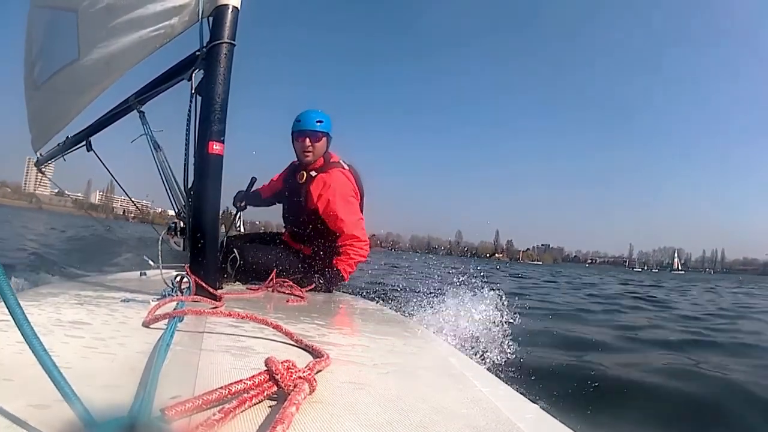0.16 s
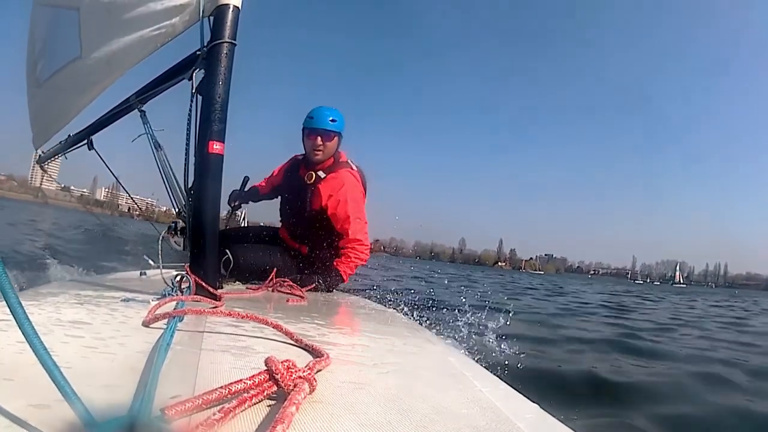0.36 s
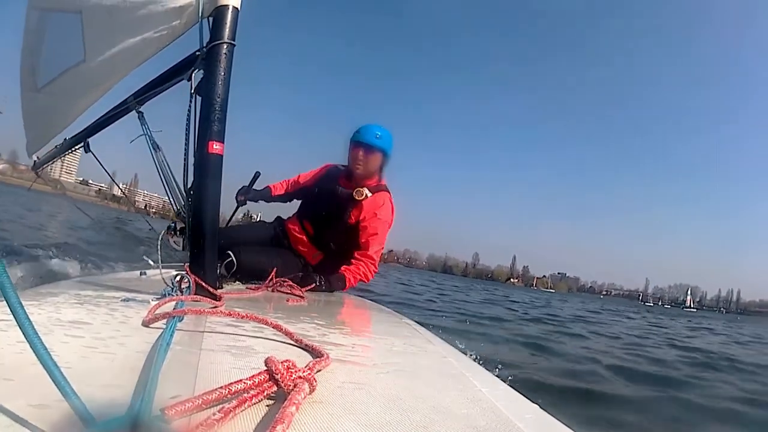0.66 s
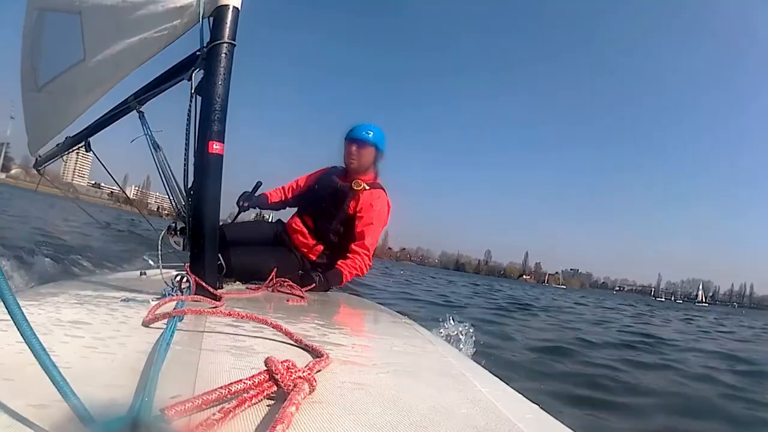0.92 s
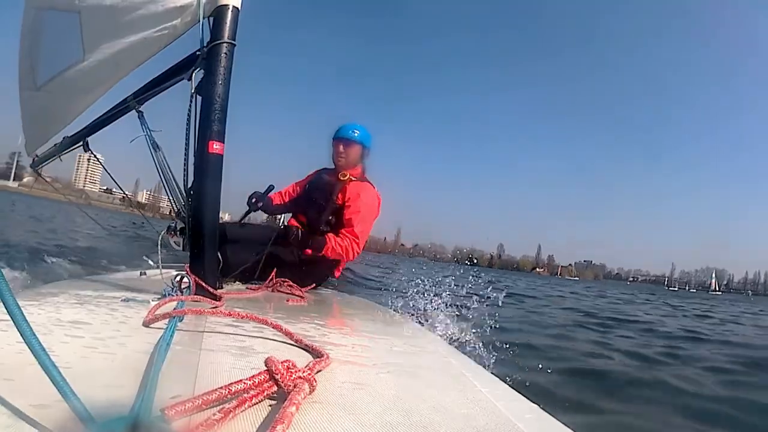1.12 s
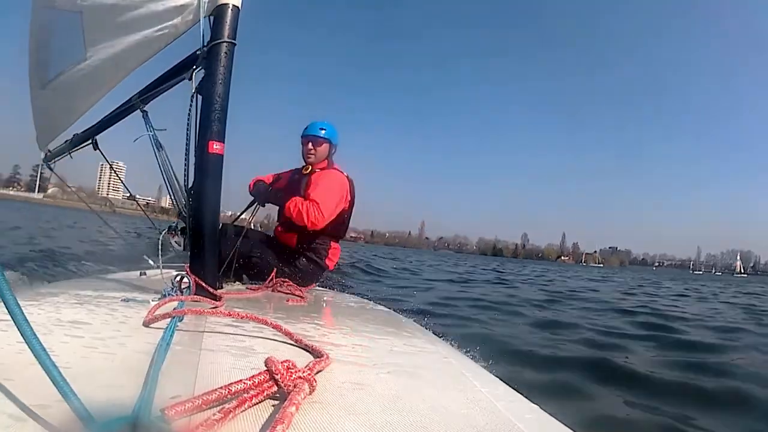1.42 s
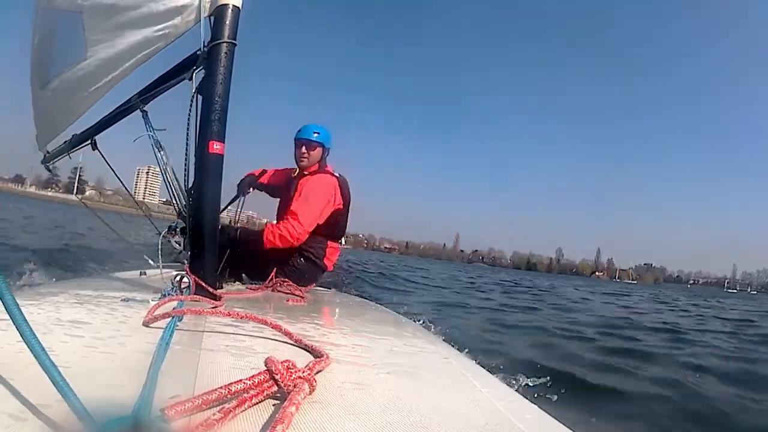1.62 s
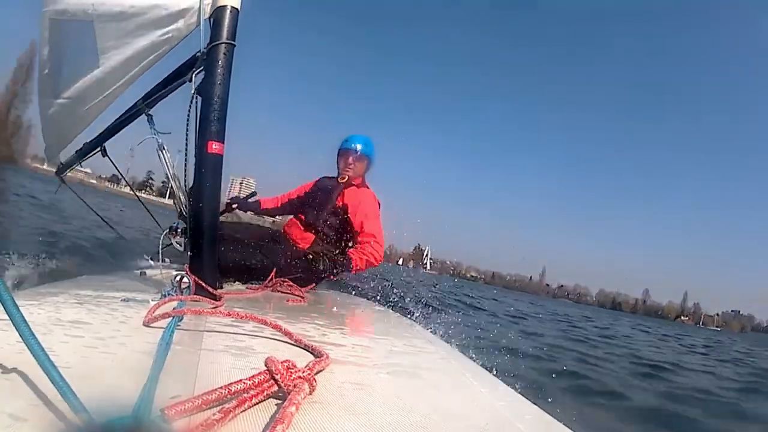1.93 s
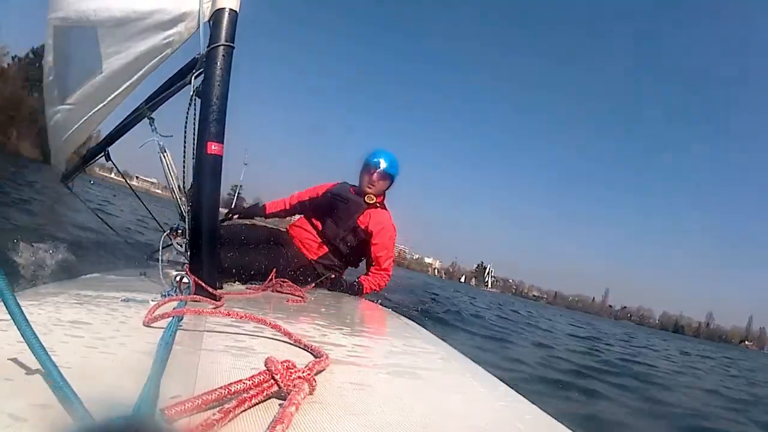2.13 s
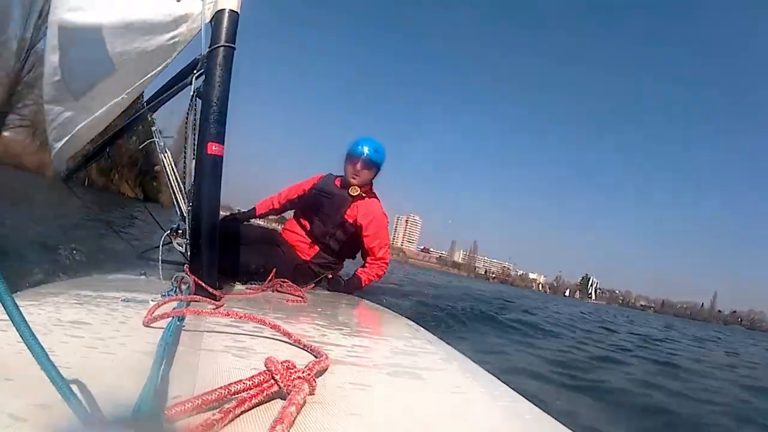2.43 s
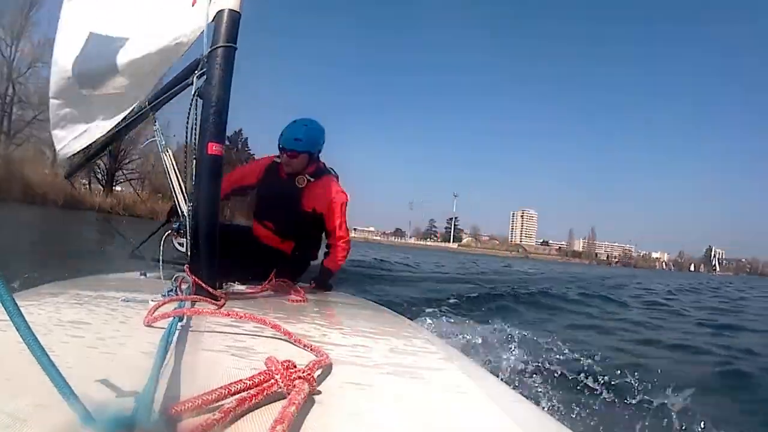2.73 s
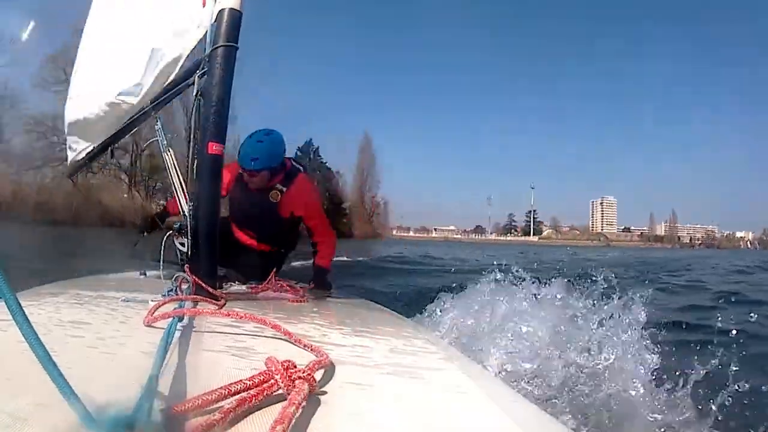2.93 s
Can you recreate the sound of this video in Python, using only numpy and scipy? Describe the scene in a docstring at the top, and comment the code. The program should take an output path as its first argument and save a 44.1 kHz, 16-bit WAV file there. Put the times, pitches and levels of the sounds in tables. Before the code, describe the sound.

Dinghy hull rumbling and thudding over choppy water, with muffled spray and drops tapping the deck.

```python
"""The hull of a small sailing dinghy heaves, drums and takes knocks, heard by a cased microphone on the bow.
Hull: noise-driven low modes, decaying sines for knocks, noise bursts for slaps, all through a limited mount.
Water: coloured noise and grains for wash, spray and hiss, which surge together; drops ring the deck.
The case cuts the top and heavy knocks overload the input."""
import sys
import numpy as np
from scipy import signal
from scipy.fft import rfft, irfft, next_fast_len
from scipy.io import wavfile
from scipy.ndimage import uniform_filter1d

SR = 44100
rng = np.random.default_rng(int(sys.argv[2]) if len(sys.argv) > 2 else 0)


def pcm_store(signal):
    """Save signal as 16-bit PCM."""
    levels = np.round(np.clip(np.atleast_2d(signal), -1, 1) * 32767)
    wavfile.write(sys.argv[1], SR, levels.astype(np.int16).T)


def amplitude_ratio(level_db):
    """Convert a level in decibels to the matching linear amplitude (field) ratio."""
    exponent = np.asarray(level_db, float) / 20
    return 10 ** exponent


N = 135387


def rms_one(x):
    """Scale to unit rms."""
    return x / np.sqrt(np.mean(x ** 2) + 1e-20)


def in_time(rows):
    """Table columns as curves per sample, linear between the rows."""
    time_s, *columns = np.transpose(rows)
    return [np.interp(np.arange(N) / SR, time_s, column) for column in columns]


def drift(rate_hz):
    """Slow random curve of unit rms: noise through a double pole, at 1/40 of the sample rate."""
    r = np.exp(-80 * np.pi * rate_hz / SR)
    noise = rng.standard_normal(N // 40 + 2002)
    slow = signal.lfilter([1], [1, -2 * r, r * r], noise)[2000:]  # skip the start-up
    return np.interp(np.arange(N) / 40, np.arange(len(slow)), rms_one(slow))


def resonance(x, hz, width_hz):
    """Two-pole resonance with a peak gain of about 1."""
    r = np.exp(-np.pi * width_hz / SR)
    gain = (1 - r * r) / 2
    return signal.lfilter([gain, 0, -gain], [1, -2 * r * np.cos(2 * np.pi * hz / SR), r * r], x)


def colour(x, points):
    """Causal minimum-phase filter through (f/Hz, level/dB) points, by folding the cepstrum."""
    size = 2 * next_fast_len(N)
    hz = np.maximum(np.arange(size // 2 + 1) * SR / size, 1)
    point_hz, point_db = np.transpose(points)
    log_gain = np.interp(np.log(hz), np.log(point_hz), point_db) * np.log(10) / 20
    cepstrum = irfft(log_gain, size)
    cepstrum[1:size // 2] *= 2
    cepstrum[size // 2 + 1:] = 0
    return irfft(rfft(x, size) * np.exp(rfft(cepstrum)), size)[:N]


def patter(grains_per_s, grain_share):
    """Smooth noise mixed by power with clicks of uneven size and random sign."""
    spread_db = 2.5 * np.minimum(rng.exponential(1, N), 4)
    sizes = amplitude_ratio(spread_db) * rng.choice([-1, 1], N)
    grains = rms_one(sizes * (rng.random(N) < grains_per_s / SR))
    return np.sqrt(grain_share) * grains + np.sqrt(1 - grain_share) * rng.standard_normal(N)


def splats(events, rise_s, t60_s, width_hz, click):
    """Short noise bursts, each with a tap of size click at first contact, ring one resonance each."""
    out, t = np.zeros(N + SR), np.arange(8000) / SR
    shape = np.minimum(t / rise_s, 1) * amplitude_ratio(-60 * t / t60_s)
    for s, db, hz in events:
        tap = click * (np.abs(t - rise_s / 2) < .1 / hz)
        burst = rng.standard_normal(len(t)) * shape + tap
        splat = resonance(resonance(burst, hz, width_hz), hz, 2 * width_hz)
        start = int(s * SR)
        out[start:start + len(t)] += amplitude_ratio(db) * splat / np.abs(splat).max()
    return out[:N]


def saturate(x, top, knee):
    """Linear well below top, flat above; a higher knee is harder."""
    return x / (1 + np.abs(x / top) ** knee) ** (1 / knee)


def hiss(surge_db):
    """Noise in a treble band flickers; its highest part also comes and goes on its own."""
    # treble spectrum: f/Hz, relative density/dB per Hz
    treble_spectrum = [(2300, -42.5), (2680, -19), (2850, 5), (3250, 0.5), (3630, -2), (3950, -13),
                       (4250, -18), (4600, -46.5)]
    flicker_db = 0.36 * surge_db + 1.5 * drift(33)
    body = colour(rng.standard_normal(N) * amplitude_ratio(flicker_db), treble_spectrum)
    top = signal.sosfilt(signal.butter(6, 3650, "high", fs=SR, output="sos"), body)
    top_db = 9.0 * np.tanh(2 * drift(9)) - 4.5
    return rms_one(body + top * (amplitude_ratio(top_db) - 1))


def spray(surge_db):
    """Grains ring 13 splash sizes that come and go separately, coloured by deck and case."""
    # colour of deck and case: f/Hz, relative density/dB per Hz
    case_spectrum = [(400, -40), (620, -6), (786, -1), (860, -3), (948, 2), (1090, -6), (1410, 2.5),
                     (1590, -5.5), (1830, 1.5), (2060, -6.5), (2280, -2.5), (2500, -10), (2680, -30),
                     (3000, -60.5)]
    splashes, q = 0, 9.5
    for hz in np.geomspace(655, 2570, num=13):
        grains = patter(grains_per_s=30, grain_share=.35) * amplitude_ratio(2.2 * drift(21))
        splashes = splashes + np.sqrt(hz) * rms_one(resonance(grains, hz, hz / q))
    return rms_one(colour(splashes * amplitude_ratio(surge_db), case_spectrum))


def wash(surge_db):
    """Dense grains and smooth noise, slowly flickering, with the spectrum of water along the hull."""
    # wash spectrum: f/Hz, relative density/dB per Hz
    wash_spectrum = [(120, -24), (170, 5), (242, -5), (300, -2), (340, 1.5), (390, 0.5), (479, -6.5),
                     (564, -6), (731, -15.5), (1000, -41.5), (1600, -68.5)]
    grains = patter(grains_per_s=200, grain_share=.5)
    return rms_one(colour(grains * amplitude_ratio(surge_db + 2 * drift(6.4)), wash_spectrum))


def water(wash_db):
    """Wash, spray and hiss share the surges of the bow wave, each at its own level."""
    # spray on the deck and treble: t/s, spray rms level/dB, treble rms level/dB
    water_levels = [(0.0, -35, -60.5), (0.01, -37.5, -61), (0.04, -39, -56), (0.27, -35.5, -55),
                    (0.33, -36.5, -50), (0.4, -32, -52.5), (0.47, -32.5, -47), (0.48, -30, -48.5),
                    (0.63, -35, -50), (0.66, -33, -45), (0.7, -31.5, -51.5), (0.81, -31.5, -52.5),
                    (0.84, -42.5, -58.5), (0.86, -39, -49), (0.88, -35, -52.5), (1.0, -36, -50),
                    (1.14, -36, -53), (1.16, -30, -48.5), (1.18, -36.5, -54), (1.48, -38, -54),
                    (1.51, -39.5, -60.5), (1.56, -36, -47.5), (1.66, -33.5, -52), (1.74, -35.5, -57.5),
                    (1.76, -35.5, -46), (1.85, -33.5, -53.5), (1.91, -31, -49.5), (2.09, -42.5, -54),
                    (2.23, -37, -54), (2.26, -44.5, -59.5), (2.42, -30, -49.5), (2.44, -41, -59.5),
                    (2.5, -42, -59), (2.52, -37.5, -45), (2.56, -38, -56), (2.74, -34.5, -55),
                    (2.81, -42, -58.5), (2.9, -31.5, -52.5), (2.96, -30.5, -50), (3.07, -40, -55)]
    spray_db, treble_db = in_time(water_levels)
    surge_db = 0.9 * drift(17)
    return amplitude_ratio(wash_db) * wash(surge_db) + amplitude_ratio(spray_db) * spray(surge_db) + amplitude_ratio(treble_db) * hiss(surge_db)


def drops():
    """Big drops strike the deck: a tap and a splash ring one deck resonance each."""
    # drops: t/s, peak level before the common gain/dB, f/Hz
    drop_events = [(0.098, -43, 1880), (0.185, -23.5, 1830), (0.285, -17, 1780), (0.326, -22.5, 1820),
                   (0.422, -20, 1456), (0.478, -18, 1770), (0.538, -23, 885), (0.659, -16.5, 930),
                   (0.711, -15, 1754), (0.859, -19, 1480), (0.947, -19, 983), (1.012, -28.5, 1360),
                   (1.046, -19.5, 1380), (1.124, -22.5, 1360), (1.157, -14, 1320), (1.339, -19.5, 1850),
                   (1.464, -26, 1940), (1.606, -25, 1240), (1.661, -19.5, 894), (1.726, -18.5, 1550),
                   (1.815, -15.5, 1440), (2.022, -22, 1770), (2.216, -29.5, 1480), (2.321, -16, 870),
                   (2.359, -17, 1800), (2.511, -31, 2140), (2.836, -22.5, 1860), (2.902, -11, 1443),
                   (2.941, -21.5, 1776)]
    gain_db = -4.5
    return amplitude_ratio(gain_db) * splats(drop_events, rise_s=.003, t60_s=.036, width_hz=360, click=0.9)


def slaps():
    """Waves slap the hull: noise bursts ring one resonance each, without a tap."""
    # slaps: t/s, peak level/dB, f/Hz
    slap_events = [(0.485, -21, 347), (0.904, -20.5, 365.5), (1.084, -23.5, 390), (1.679, -21.5, 348),
                   (1.85, -22, 300), (1.883, -18.5, 330), (1.906, -19, 352), (1.914, -21.5, 830),
                   (1.69, -24, 840), (0.769, -20, 795), (0.797, -19, 637), (1.94, -20, 229),
                   (2.323, -23, 374), (2.398, -21.5, 303), (2.579, -22.5, 454), (2.676, -31.5, 221),
                   (2.894, -15, 214), (2.973, -17, 215)]
    return splats(slap_events, rise_s=.0018, t60_s=.19, width_hz=151, click=0)


def knocks():
    """The hull swings unevenly on one low mode, holds, then is damped by the water."""
    # knocks: t/s, peak level before wobble/dB, f/Hz, time from onset to decay/s
    knock_events = [(.767, 2.5, 112, .059), (1.9327, -2.5, 131, .039), (1.929, -6.5, 44, .045),
                    (.929, -10, 110, .06), (.226, -11, 130, .03), (2.603, -9, 125, .02),
                    (2.008, -13, 130, .03), (2.43, -14, 100, .03)]
    rise_s, t60_s = .009, .045
    wobble_db, wander_rad = 2.5 * drift(46), .22 * drift(66)
    out = 0
    for s, db, hz, hold_s in knock_events:
        t = np.maximum(np.arange(N) / SR - s, 0)
        shape = np.minimum(t / rise_s, 1) * amplitude_ratio(-60 * np.maximum(t - hold_s, 0) / t60_s)
        out = out - amplitude_ratio(db) * shape * np.sin(2 * np.pi * hz * t + wander_rad)
    return out * amplitude_ratio(wobble_db)


def hull(modes, level_db, steady):
    """Turbulence drives low modes; the water damps the widest swings (steady: 0 none, 1 most even)."""
    body = 0
    for hz, width_hz, db in modes:
        noise = rng.standard_normal(N + SR)
        ringing = resonance(resonance(noise, hz, width_hz), hz, 2 * width_hz)[SR:]  # already swinging
        body = body + amplitude_ratio(db) * rms_one(ringing)
    body = rms_one(body)
    envelope = np.abs(signal.hilbert(body, next_fast_len(N))[:N])
    swing = uniform_filter1d(envelope, size=800) + .15
    return amplitude_ratio(level_db) * rms_one(body / swing ** steady)


def sway(level_db):
    """The hull's lowest modes heave under turbulence."""
    # sway modes: f/Hz, width of the first of two resonances/Hz, relative level/dB
    sway_modes = [(22.6, 18, -8.5), (32.5, 8, -2), (46, 26, -6.5)]
    return hull(sway_modes, level_db, steady=0.3)


def drumming(level_db):
    """The hull's next modes drum under turbulence, more evenly than the sway."""
    # drum modes: f/Hz, width of the first of two resonances/Hz, relative level/dB
    drum_modes = [(88.6, 26.5, -2), (111.6, 24, -4.5), (131.7, 17, 0), (173, 45.4, -11)]
    return hull(drum_modes, level_db, steady=0.55)


def scene():
    """The hull's swing passes a mount of limited travel; water sounds ride on top."""
    # hull and wash: t/s, sway rms level/dB, drumming rms level/dB, wash rms level/dB
    hull_levels = [(0, -23, -19.5, -29), (.09, -19.5, -22.5, -37.5), (.16, -33.5, -24, -29.5),
                   (.23, -22, -17.5, -37.5), (.34, -31, -19, -32.5), (.5, -23, -21, -30.5),
                   (.62, -31, -27, -31.5), (.67, -44.5, -17, -33.5), (.76, -29, -22, -34),
                   (.8, -24, -16.5, -23.5), (.845, -20.5, -16, -38.5), (.91, -20.5, -20.5, -29.5),
                   (.97, -15, -15.5, -31), (1.07, -20.5, -24.5, -35), (1.1, -20, -23, -34.5),
                   (1.17, -29, -19.5, -32), (1.25, -21, -25, -33.5), (1.39, -31.5, -24.5, -33),
                   (1.47, -18.5, -23, -29.5), (1.54, -16, -30.5, -42.5), (1.68, -31, -21.5, -28.5),
                   (1.77, -22, -18, -29), (1.81, -19.5, -26, -28), (1.87, -18.5, -17.5, -27.5),
                   (1.915, -33, -12, -31), (1.935, -3, -11.5, -26), (1.97, -32, -17.5, -21.5),
                   (2.01, -30, -20, -34), (2.15, -23.5, -23, -41), (2.21, -24, -28, -32.5),
                   (2.29, -41, -20, -34.5), (2.36, -20, -21, -32.5), (2.49, -20.5, -28, -40),
                   (2.57, -20.5, -24.5, -33.5), (2.62, -12.5, -17.5, -32), (2.72, -17, -19.5, -29.5),
                   (2.8, -14.5, -22, -38.5), (2.85, -15.5, -24, -24), (2.88, -24, -22, -38),
                   (2.91, -9.5, -22.5, -38), (2.94, -20, -17, -29), (2.97, -11.5, -18.5, -23.5),
                   (3.03, -10.5, -15, -31.5), (3.07, -16, -26, -25)]
    sway_db, drum_db, wash_db = in_time(hull_levels)
    swing = sway(sway_db) + drumming(drum_db) + knocks() + slaps()
    mounted = saturate(swing, top=.7, knee=7)
    return (mounted + water(wash_db) + drops())[None]


def band_limit(x):
    """A steep low-pass at the top of the band."""
    return signal.sosfilt(signal.butter(12, 4330, fs=SR, output="sos"), x)


def record(dry):
    """The case cuts the top steeply, the input clips hard."""
    # 70 dB down from 5664 Hz
    case_cut = signal.cheby2(10, 70, 5664, fs=SR, output="sos")
    cased = signal.sosfilt(case_cut, dry)
    clipped = saturate(cased, top=.705, knee=30)
    return band_limit(clipped)


dry = scene()
out = record(dry)
pcm_store(out)
```